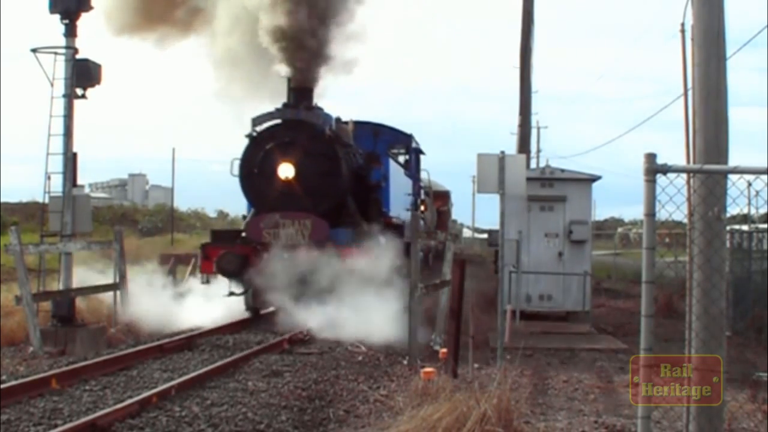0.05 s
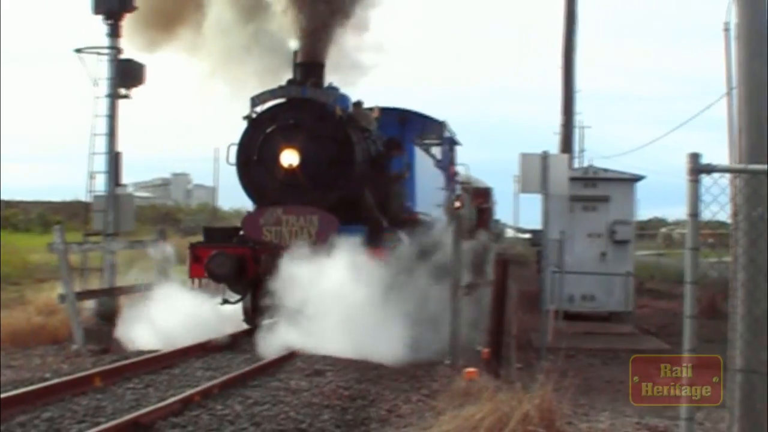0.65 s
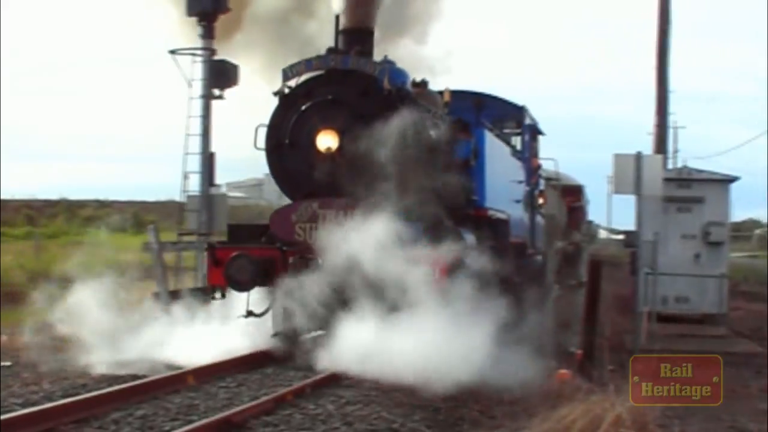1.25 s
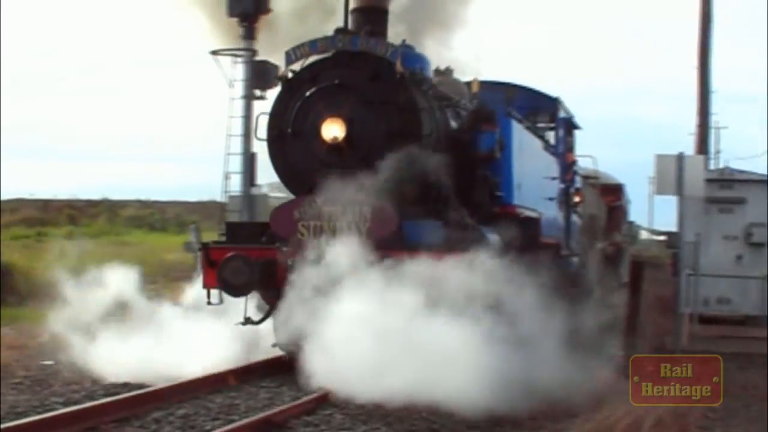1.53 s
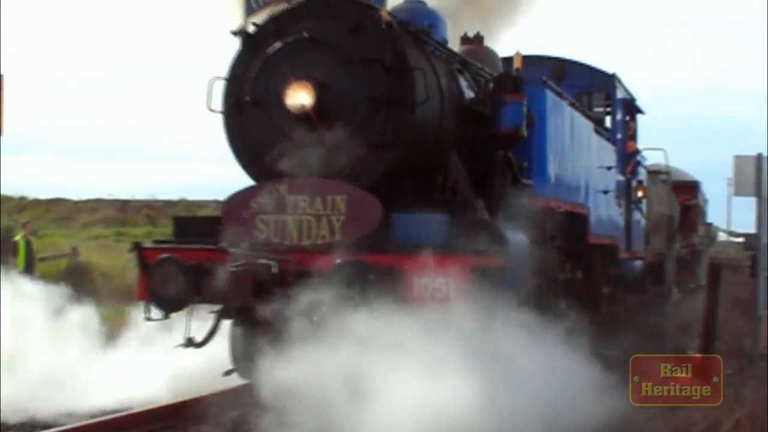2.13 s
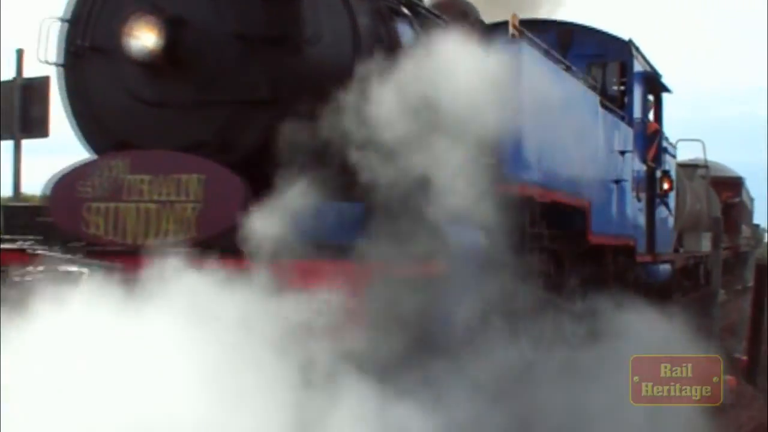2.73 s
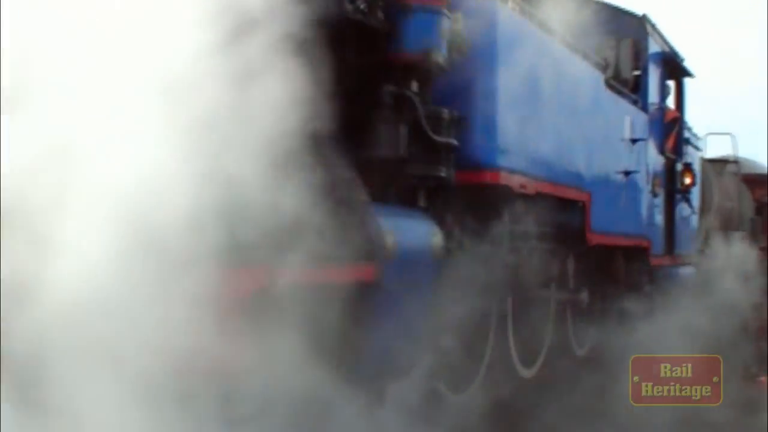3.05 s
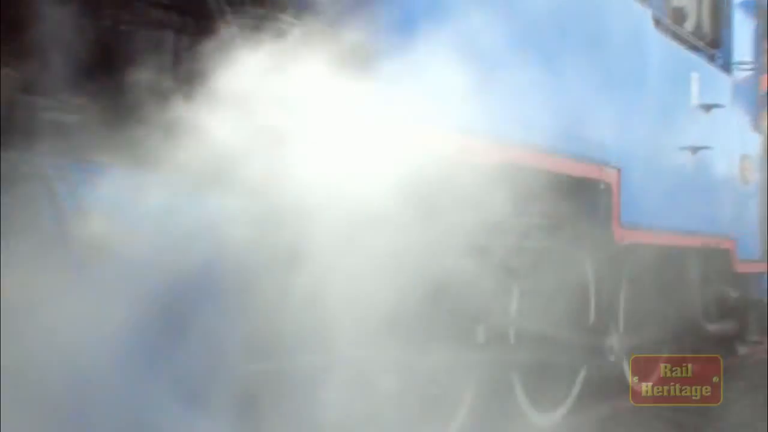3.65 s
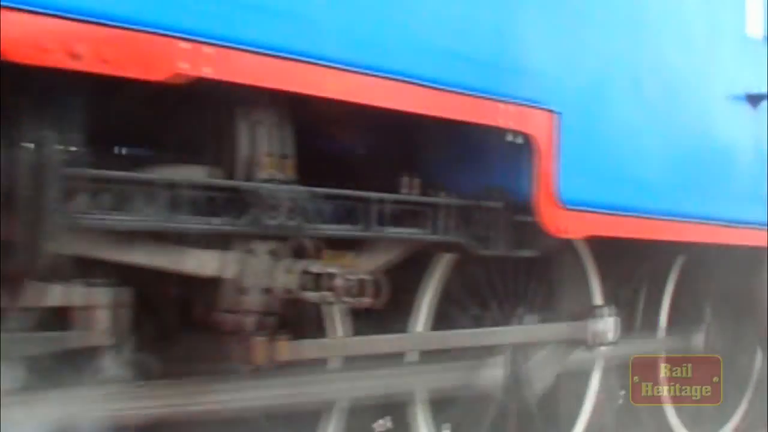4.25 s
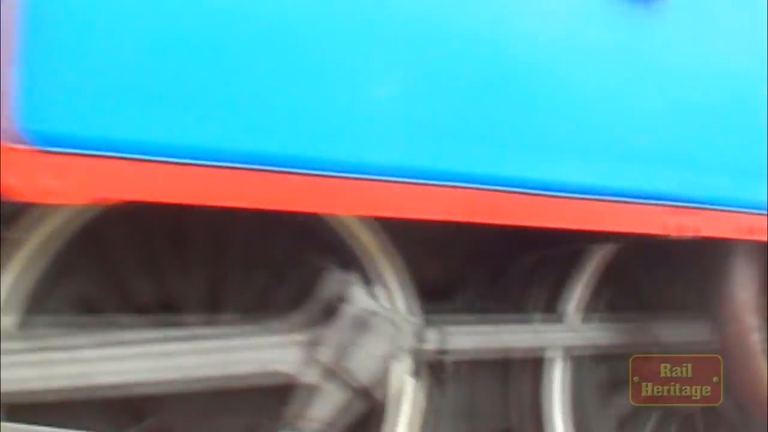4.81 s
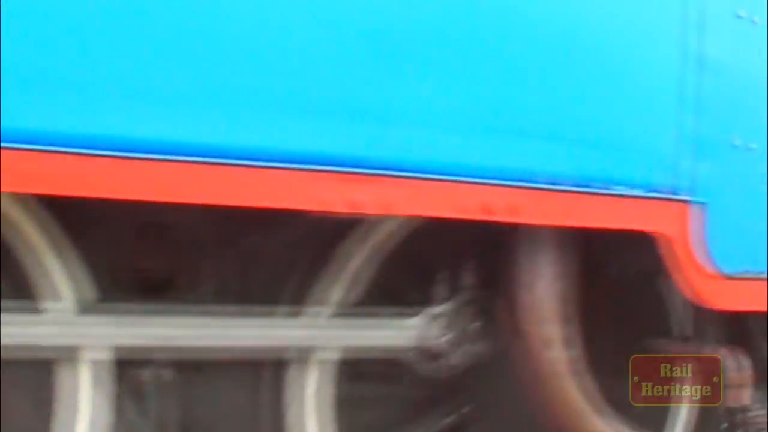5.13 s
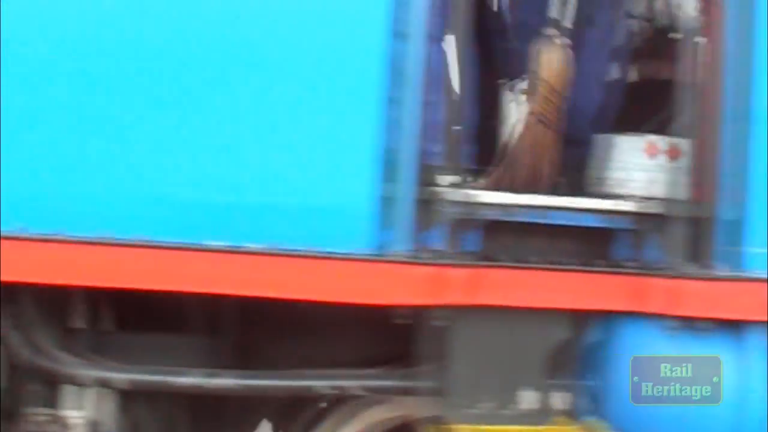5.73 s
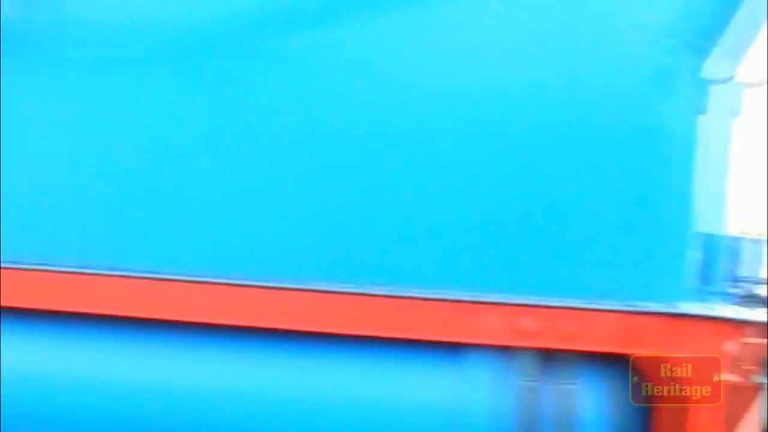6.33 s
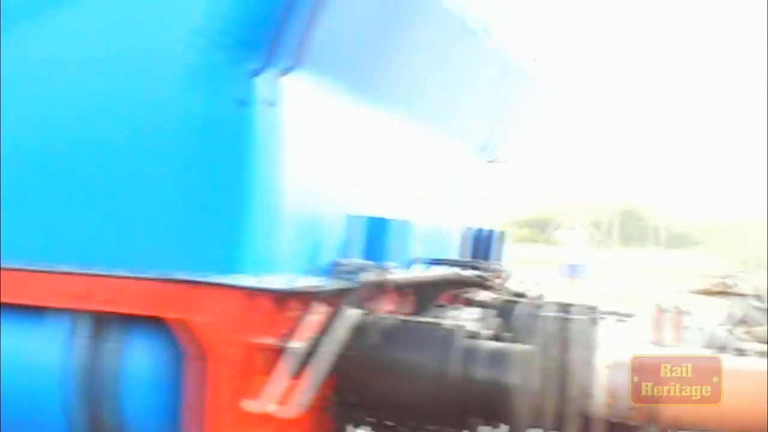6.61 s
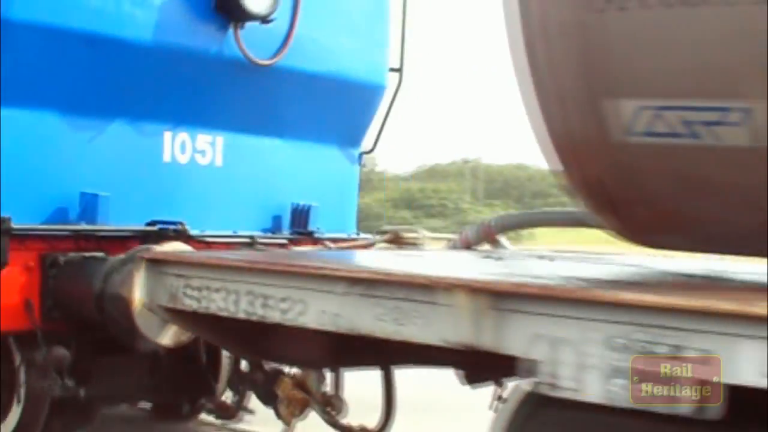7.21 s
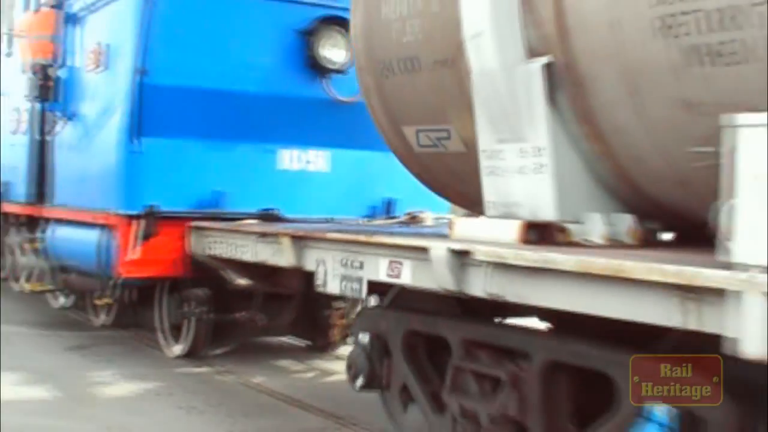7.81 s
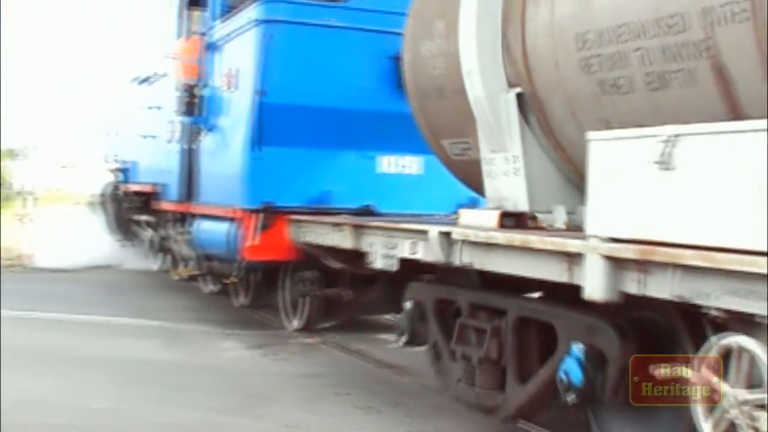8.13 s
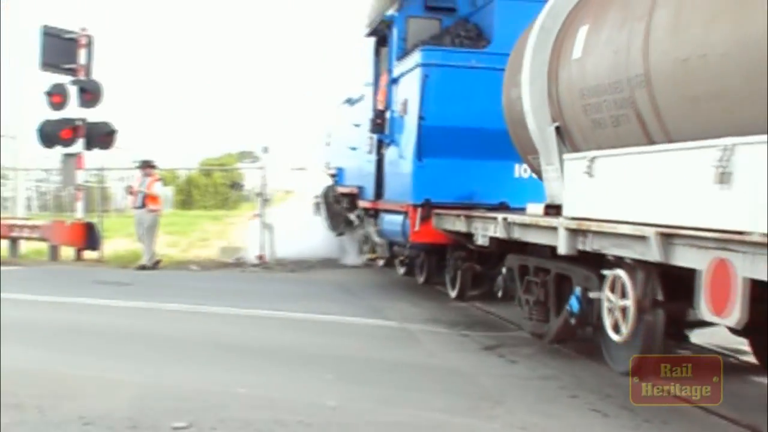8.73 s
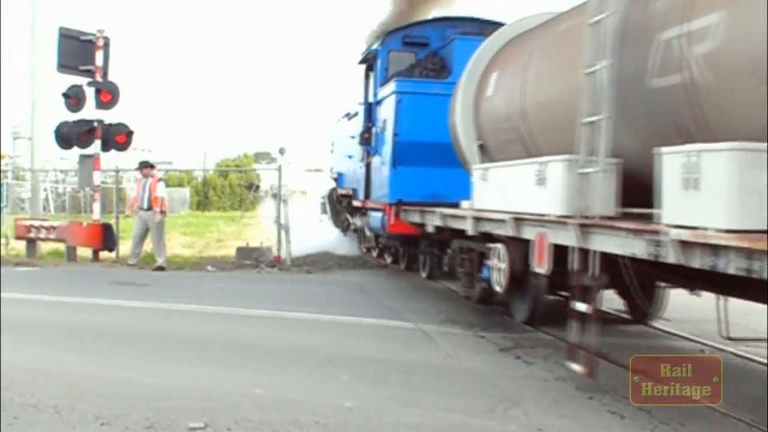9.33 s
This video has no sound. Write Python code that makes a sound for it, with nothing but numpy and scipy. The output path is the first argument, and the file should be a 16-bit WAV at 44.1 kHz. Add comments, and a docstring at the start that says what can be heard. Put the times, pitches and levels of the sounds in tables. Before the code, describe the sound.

A steam locomotive passes close by, hissing loudly over steady chimney puffs, then a wagon rumbles and knocks over rail joints.

```python
"""Beside a railway line, a steam tank engine comes up and passes close by with its cylinder cocks
(drain valves) open. Steam hisses onto the track stones and pulses with the pistons. The chimney
puffs four times to a wheel turn, slowly quickening: each puff is a bark with a low boom under it.
The steam cloud briefly blows over the microphones. Behind the engine a tank wagon drums and
knocks over a level crossing."""
import sys
import numpy as np
from scipy import signal
from scipy.fft import irfft, next_fast_len
from scipy.io import wavfile
from scipy.ndimage import uniform_filter1d

SR = 44100
rng = np.random.default_rng(int(sys.argv[2]) if len(sys.argv) > 2 else 0)


def put_to_file(sound):
    """Save the sound as 16-bit audio at rate SR, in the file named by the first command-line argument."""
    columns = np.atleast_2d(sound).T  # one column per channel
    safe = np.clip(columns, -1, 1)
    whole_steps = np.round(safe * 32767)
    wavfile.write(sys.argv[1], SR, whole_steps.astype(np.int16))


N = 413216
FRAME, HOP = 512, 128  # the hiss is built in short overlapping frames: length and step in samples
TIME = np.arange(N) / SR
FRAME_S = np.arange(N // HOP + 5) * HOP / SR
BIN_HZ = np.fft.rfftfreq(FRAME, 1 / SR)


# Steam loudness: (time [s], jet at the nozzle [relative dB], roar on the ground [relative dB])
STEAM_LEVELS = [(0, -16.5, -20), (.8, -15.9, -18.5), (1.4, -16.4, -19), (2.2, -15, -20), (2.7, -13, -17),
                (3.1, -13.5, -17.5), (3.6, -13, -17), (4.3, -14, -16.5), (4.7, -12.5, -17.5),
                (5.3, -14.5, -18.5), (5.7, -14, -22), (6.1, -14.5, -19.5), (6.65, -16.3, -23),
                (7, -16.5, -19.9), (8.2, -17.5, -20.5), (9.37, -18, -21)]
# Tone of the jet and the roar, far off and close by: (frequency [Hz], relative level [dB])
JET_FAR = [(2500, -66), (5500, -17), (6700, -10), (7300, -0.5), (8100, 0), (8800, -2), (9600, -4.5),
           (10600, -11.5), (12500, -17.5), (14000, -25), (16000, -29)]
JET_NEAR = [(2500, -38), (5000, -9), (6000, -4.5), (7300, -3), (8800, 0), (9600, -3.5), (11000, -10.5),
            (13000, -15), (16000, -23)]
ROAR_FAR = [(60, -15.5), (300, -25), (700, -21.5), (1050, -10.5), (1500, -8.5), (2000, -1.5), (2700, -0.5),
            (5000, 2.5), (6500, -1.5), (9000, -30), (16000, -45)]
ROAR_NEAR = [(40, -30), (150, -5.5), (400, -8.5), (900, -2.5), (2000, -0.5), (3200, 0.5), (4800, 0.5),
             (6500, -3.5), (9000, -9), (16000, -45)]

def steam_hiss(jet_db=0.34, roar_db=0.98, jet_pulse=1.08, roar_pulse=0.89):
    """Steam hisses from the cocks and roars on the ground, pulsing with the cylinder pressure."""
    colour_db = passing_colour()
    pulse_db = cylinder_pressure()
    jet_level, roar_level = follow(STEAM_LEVELS, TIME) + spurts()
    jet = plume(JET_FAR, JET_NEAR, colour_db, patchy_db=1.14, flutter_db=0.6, whistle_db=1.2)
    roar = plume(ROAR_FAR, ROAR_NEAR, colour_db, patchy_db=1.13, flutter_db=.5, whistle_db=1.54)
    jet *= amp(jet_level + jet_db + jet_pulse * pulse_db)
    roar *= amp(roar_level + roar_db + roar_pulse * pulse_db + billow())
    return jet + roar


def plume(far, near, colour_db, patchy_db, flutter_db, whistle_db):
    """Swirling steam makes noise with faint shifting whistles; it fills out as it nears."""
    nearness = position(FRAME_S)[0][:, None]
    swirl_db = patchy_db * eddies(frames=45, bins=6) + whistle_db * eddies(frames=110, bins=2)
    strength = amp(blend(far, near, nearness, BIN_HZ) + colour_db + swirl_db)
    strength /= np.linalg.norm(strength, axis=1, keepdims=True)  # same power in every frame
    strength *= amp(flutter_db * eddies(frames=9, bins=70))
    spectra = at_microphones(strength).transpose(0, 2, 1)
    _, hiss = signal.istft(spectra, nperseg=FRAME, noverlap=FRAME - HOP)
    return unit(hiss[:, :N])


# The ground's echo ripples the tone: (time [s], ripple spacing [Hz], depth [dB])
GROUND_RIPPLE = [(0, 546, 1), (2.0, 805, 0), (2.9, 1090, -0.5), (3.02, 1150, 3.5), (3.17, 1080, 0.5),
                 (3.45, 1180, 0), (7.2, 1370, -0.5), (8.0, 1420, 1.3), (9.37, 1440, -0.5)]
# Steam sweeps over the stones: (time [s], half length [s], pitch [Hz], half width [Hz], boost [dB])
SWISHES = [(0.303, 0.23, 2680, 690, 4), (0.862, 0.18, 4270, 450, 7), (1.892, 0.17, 2650, 870, 7),
           (2.6, 0.27, 3865, 40, 5), (4.57, 0.12, 6700, 600, 6), (5.29, 0.16, 2200, 300, 3.5),
           (6.15, 0.85, 6500, 600, 3), (7.2, 0.44, 4800, 810, 5)]
# The very top of the hiss dulls while it is heard from the side: (frequency [Hz], change [dB])
SIDE_TONE = [(8500, -0.5), (11000, 0), (16000, -4.5)]
# Tone of the hiss from behind: (frequency [Hz], change [dB])
REAR_TONE = [(1600, 0), (1930, 1), (2300, -1.8), (2950, 0), (3460, -4), (4100, 1.1), (5600, -0.2),
             (6750, -1.3), (7600, 0)]

def passing_colour(side_bearing=0.67, side_span=.2):
    """The ground colours the hiss (dB); its tone also shifts when heard from the side and behind."""
    spacing_hz, depth_db = (c[:, None] for c in follow(GROUND_RIPPLE, FRAME_S))
    colour_db = depth_db * np.cos(2 * np.pi * BIN_HZ / spacing_hz) * bump(BIN_HZ, 0, 8000)
    for s, length, hz, width_hz, db in SWISHES:
        colour_db += db * np.outer(bump(FRAME_S, s, length), bump(BIN_HZ, hz, width_hz))
    from_side = np.clip((position(FRAME_S)[1] - side_bearing) / side_span, 0, 1)
    colour_db += np.outer(from_side, read(SIDE_TONE, BIN_HZ))
    return colour_db + np.outer(from_behind(FRAME_S), read(REAR_TONE, BIN_HZ))


# The four beats of a wheel turn, far and near cylinder by turns: (puff accent [dB],
# sag from ahead [dB], sag from behind [dB], surge from ahead [dB], surge from behind [dB])
WHEEL_TURN = [(-0.5, 1.5, -0.1, 0.5, 0.5), (-0.3, 2, 4.5, .5, 0.44), (-0.2, .7, 0, 0.4, 0.1),
              (0.5, 2.6, 3, 0.6, 1)]

def cylinder_pressure(sag_delay_s=0.011, sag_s=0.02, surge_delay_s=0.082, surge_s=0.051):
    """The pressure (dB) sags as the exhaust opens, then surges with fresh steam."""
    db = np.zeros(len(FRAME_S))
    for beat, s in beats():
        _, sag_ahead, sag_behind, surge_ahead, surge_behind = WHEEL_TURN[beat % len(WHEEL_TURN)]
        sag_db = np.interp(passed(s), [0, 1], [sag_ahead, sag_behind])
        surge_db = np.interp(passed(s), [0, 1], [surge_ahead, surge_behind])
        db -= sag_db * bump(FRAME_S, s + sag_delay_s, sag_s)
        db += surge_db * bump(FRAME_S, s + surge_delay_s, surge_s)
    return np.interp(TIME, FRAME_S, db)


def billow(depth_db=1.0, crest_beat=2.8, near_lag_beats=1.84):
    """Front and rear cocks take turns, so the roar swells (dB) once a wheel turn; behind, they merge."""
    turns = (beat_count() - crest_beat - near_lag_beats * position(FRAME_S)[0]) / len(WHEEL_TURN)
    swell_db = depth_db * (1 - from_behind(FRAME_S)) * np.cos(2 * np.pi * turns)
    return np.interp(TIME, FRAME_S, swell_db)


# Extra gushes of steam: (start [s], length [s], jet change [dB], roar change [dB])
SPURTS = [(0.666, 0.11, 1, -1), (1.702, 0.13, 1, 1), (2.978, 0.17, -1.3, 2), (3.473, 0.064, 1, -0.5),
          (6.88, 0.22, 0, 0.4), (7.37, .07, 0, 1.4), (7.816, .08, .7, 1)]

def spurts(edge_s=.015):
    """The cocks spit, briefly changing the level (dB) of the jet and the roar."""
    db = np.zeros((2, N))
    for s, length, jet_db, roar_db in SPURTS:
        inside_s = np.minimum(TIME - s, s + length - TIME)
        db += np.outer([jet_db, roar_db], np.clip(inside_s / edge_s + .5, 0, 1))
    return db


# Sound from the side meets the two microphones out of step: (frequency [Hz], left's lead [radians])
SIDE_PHASE = [(100, .3), (1000, 0.099), (3000, 0.57), (5000, 1.3), (7200, 1.63), (9300, 2.6), (12000, 2.85),
              (16000, 2.1)]
# Balance for sound from ahead and from the side: (frequency [Hz], left minus right [dB])
BALANCE_AHEAD = [(100, -7), (2200, 0), (3800, -2), (6300, -3.5), (8000, 0), (9500, -5), (11500, -1.5),
                 (16000, 1)]
BALANCE_SIDE = [(100, -1), (4600, 0), (6000, 0.5), (8200, -1), (9600, 1), (11300, 4.5), (13000, 1.5),
                (15000, 0)]
# How alike left and right are, normally and for steam from the side: (frequency [Hz], likeness [0-1])
LIKENESS = [(25, 0.98), (160, 0.99), (450, 0.99), (800, 0.97), (2000, 1), (6500, 0.99), (8200, .9),
            (9400, 0.64), (11000, 0.52), (13300, 1), (16000, .98)]
LIKENESS_SIDE = [(100, 0.23), (2000, 1), (4000, 1), (5500, 0.99), (7500, 0.93), (9000, 0.87), (12000, 0.68),
                 (16000, 0.7)]

def at_microphones(strength, wrap_hz=4200, swing=0.99, enfold=1.7):
    """The steam's noise reaches left and right differently, depending on where it comes from."""
    _, bearing, surround = (c[:, None] for c in position(FRAME_S))
    sideways = np.clip(swing * bearing + enfold * surround, 0, 1)
    likeness = blend(LIKENESS, LIKENESS_SIDE, sideways, BIN_HZ)
    likeness *= 1 - surround * bump(BIN_HZ, 0, wrap_hz)  # in the cloud each side hears its own swirls
    balance_db = blend(BALANCE_AHEAD, BALANCE_SIDE, sideways, BIN_HZ)
    left = np.exp(.5j * bearing * read(SIDE_PHASE, BIN_HZ)) * amp(balance_db / 2)
    return random_pair(likeness, strength.shape) * strength * np.array([left, 1 / left])


# The cocks go by: (time [s], nearness [0-1], bearing [0 ahead, 1 beside], cloud around us [0-1])
PATH = [(0, 0.06, 0.04, 0), (2.2, 0.32, 0.04, 0.01), (2.8, 0.55, 0.014, 0.2), (3.4, 0.89, 0.055, 0.42),
        (4.0, 1, 0.47, 0.93), (4.35, 0.97, 0.71, 0.64), (4.55, 0.88, 0.93, 0.85), (5.5, 0.63, 0.97, 0.2),
        (6.4, 0.4, 0.97, 0), (7.2, 0.65, 0.76, 0), (8.1, 0.23, 0.42, 0), (8.6, 0.37, 0.16, 0),
        (9.37, 0.07, 0.16, 0.03)]

def position(s):
    """Nearness, bearing and surrounding cloud at s seconds."""
    return follow(PATH, s)


def passed(s, start_s=1.9, span_s=2.4):
    """How far the pistons' sound has turned from coming (0) to going (1)."""
    return np.clip((s - start_s) / span_s, 0, 1)


def from_behind(s, start_s=7.3, span_s=0.86):
    """How much the engine is heard from behind, 0 to 1."""
    return np.clip((s - start_s) / span_s, 0, 1)


# Puff strength: (time [s], far cylinder [relative dB], near cylinder [relative dB], boom offset [dB])
PUFF_LEVELS = [(0, -25.5, -27.5, -6), (1.4, -26.5, -26, -4), (2.15, -23, -24, -5.5), (2.7, -26.5, -24, -4),
               (3.4, -31, -24, -3), (4.2, -29.5, -23, -.5), (4.9, -30, -20.3, -1),
               (5.5, -23.5, -19.5, -5.5), (6.1, -26.5, -23.5, -8), (6.7, -21.5, -19.5, -5.5),
               (7.9, -30, -19.5, -7), (8.5, -24.5, -21, -0.5), (9.37, -31, -20.5, -14)]
# Puffs that boom harder than the rest: (time [s], extra boom [dB])
HEAVY_PUFFS = [(.065, 6.5), (1.4, 4.5), (3.45, 3.5), (4.93, 3.5), (7.33, 5.5), (8.72, 6)]
# Tone of the bark from ahead and behind, and of the boom: (frequency [Hz], relative level [dB])
BARK_AHEAD = [(40, -33), (150, 1), (260, -12), (365, 3), (510, -5), (750, -4.5), (1100, -4), (1600, -6),
              (4000, -28), (12000, -60)]
BARK_BEHIND = [(40, -25), (140, -0.5), (290, 2.5), (400, -1), (560, 1), (830, -1), (1050, -3), (1300, -3),
               (1600, -4), (1900, -6), (3000, -7), (12000, -39)]
BOOM_TONE = [(25, -38), (60, -42), (100, -23), (135, -7.5), (163, 6), (200, -2), (260, -16), (400, -21),
             (1500, -45)]

def chimney(bark_db=2.5, valve_open_s=0.15, boom_lag=1.47, rebound_s=0.043, rebound_db=-5.5):
    """Steam barks out until the valve shuts; the air in the smokebox below booms and rebounds once."""
    out, t = np.zeros((2, N)), np.arange(SR // 4) / SR
    valve = np.exp(-(t / valve_open_s) ** 6)
    for beat, peak_s in beats():
        far_db, near_db, boom_db = follow(PUFF_LEVELS, peak_s)
        boom_db += sum(db for s, db in HEAVY_PUFFS if abs(s - peak_s) < .1)
        level = (near_db if beat % 2 else far_db) + WHEEL_TURN[beat % len(WHEEL_TURN)][0]
        rise_s = .035 - .011 * position(peak_s)[0]  # snappier close by
        start_s, gone = peak_s - rise_s, passed(peak_s)
        rise_s += 0.0049 * from_behind(peak_s)  # softer from behind

        def bark_tone(hz):
            return blend(BARK_AHEAD, BARK_BEHIND, gone, hz) + hollow_ring(hz) + ground_echo(hz, beat)

        bark = puff(bark_tone, swell(t / rise_s, sharpness=1.52 + 0.22 * gone) * valve)
        boom = puff(lambda hz: read(BOOM_TONE, hz), swell(t / rise_s / boom_lag, sharpness=3.6))
        boom *= amp(level + boom_db)
        add(out, start_s, amp(level + bark_db) * bark + boom)
        add(out, start_s + rebound_s, amp(rebound_db - 7 * gone) * boom)
    return out


def puff(colour_db, shape):
    """A gust of noise whose loudness follows the given shape."""
    gust = noise(colour_db, size=len(shape)) * shape
    return gust * np.sqrt(np.sum(shape ** 2) / np.sum(gust ** 2 / 2))


# The chimney's hollow notes: (pitch [Hz], half width [Hz], boost [dB])
CHIMNEY_NOTES = [(510, 65, 2.5), (660, 28, 2), (820, 53, 3.5), (960, 74, 3.5), (1910, 90, 6)]

def hollow_ring(hz):
    """The air inside the chimney boosts (dB) the pitches it rings at."""
    return sum(db * bump(hz, pitch_hz, width_hz) for pitch_hz, width_hz, db in CHIMNEY_NOTES)


def ground_echo(hz, beat, bounce=.72, rough_hz=2800, nearest_spacing_hz=246.5, nearest_beat=15.1):
    """The bark bounces off rough stones, rippling its tone (dB); the ripples widen with distance."""
    distance = np.hypot(1, 0.1416 * (beat - nearest_beat))  # 1 at the closest point
    spacing_hz = nearest_spacing_hz * distance
    echo = bounce * bump(hz, 0, rough_hz) * np.exp(-2j * np.pi * hz / spacing_hz)
    return 20 * np.log10(abs(1 + echo))


# The engine gathers speed: (time [s], puff rate [beats per second])
SPEED = [(0, 3.679), (1.6, 3.846), (3, 3.956), (9.37, 4.39)]

def beat_count(first_beat=.236):
    """Beats gone by at each frame, counted from the first puff."""
    return np.cumsum(follow(SPEED, FRAME_S)[0]) * HOP / SR - first_beat


def beats(late_beats=.018):
    """Number and time (s) of every puff; the near cylinder's valve opens a little late."""
    count = beat_count()
    return [(k, np.interp(k + late_beats * (k % 2), count, FRAME_S)) for k in range(int(count[-1]) + 1)]


# Loudness of the wagon's drumming: (time [s], relative level [dB])
DRUM_LEVELS = [(0, -51), (2.4, -48), (3.3, -39), (4.3, -43), (5.4, -31.5), (6.2, -32.5), (6.55, -24.5),
               (7.1, -27.5), (7.5, -22.5), (8.15, -25), (8.6, -19.5), (8.9, -24.5), (9.1, -24), (9.24, -16),
               (9.37, -19.5)]
# Tone of the drumming: (frequency [Hz], relative level [dB])
DRUM_TONE = [(20, -41), (45, -30), (70, -18), (105, -9), (150, -4), (185, 1), (215, 0.5), (260, -6),
             (340, -12.5), (600, -14), (1200, -19), (3000, -31), (12000, -57)]
# Wheels hit rail joints: (time [s], relative level [dB])
KNOCKS = [(7.343, -7), (7.508, -12), (8.284, -7), (8.718, -0.5), (9.136, -15), (9.275, -10), (9.353, -7)]
# The wagon's ringing notes: (base pitch [Hz], relative level [dB], time to fade by 60 dB [s])
WAGON_NOTES = [(112, -23, 0.098), (171.5, -2, 0.19), (221, -13, 0.14), (290, -25, 0.035), (484, 8, 0.011),
               (640, -13, 0.076), (990, -16, 0.048)]

def wagon_wheels(drum_db=-1.0, knock_db=-2.5, contact_s=0.0031):
    """Rolling wheels make the wagon drum; each rail joint knocks it and makes it ring."""
    out = noise(lambda hz: read(DRUM_TONE, hz), size=N) * amp(follow(DRUM_LEVELS, TIME)[0] + drum_db)
    t = np.arange(SR // 4) / SR
    for s, level in KNOCKS:
        ring = np.zeros(len(t))
        for hz, db, fade_s in WAGON_NOTES:
            cycles = hz * rng.uniform(1.0, 1.05) * t + rng.random()
            ring += amp(db - 60 * t / fade_s) * np.sin(2 * np.pi * cycles)
        add(out, s, amp(level + knock_db) * ring * (1 - np.exp(-t / contact_s)))
    return out


def cloud_gust(peak_s=4.15, half_length_s=0.11, db=-30):
    """The steam cloud blows over the microphones, shaking each on its own."""
    out, t = np.zeros((2, N)), np.arange(SR) / SR
    tone = [(20, -23), (85, -1), (200, 4), (600, -20), (3000, -45)]  # (frequency [Hz], level [dB])
    gust = np.array([noise(lambda hz: read(tone, hz), size=SR)[0] for _ in range(2)])
    add(out, peak_s - .5, amp(db) * gust * bump(t, .5, half_length_s))
    return out


def lineside_echoes(sound, fade_s=0.64, echo_db=-19, echoes_per_s=2000):
    """Huts, fences and ground by the line throw back a thin scatter of echoes."""
    t = np.arange(SR // 2) / SR
    echoes = rng.standard_normal((2, len(t))) * (rng.random((2, len(t))) < echoes_per_s / SR)
    echoes *= amp(-60 * t / fade_s) * (t > .02)
    echoes += echoes.mean(0) * 2  # left and right share most of them
    echoes /= np.linalg.norm(echoes[0])
    return amp(echo_db) * signal.fftconvolve(sound, echoes, axes=1)[:, :N]


def amp(db):
    """Turns decibels into a gain."""
    return 10 ** (np.asarray(db) / 20)


def unit(x):
    """Scales a signal to an average power of 1."""
    return x / np.sqrt(np.mean(x ** 2) + 1e-20)


def bump(x, centre, half_width):
    """A bell curve, 1 at its centre."""
    return np.exp(-((x - centre) / half_width) ** 2)


def swell(age, sharpness):
    """Rises from 0, peaks at age 1, then dies away."""
    return (age * np.exp(1 - age)) ** sharpness


def read(points, hz):
    """Looks up a table at any frequency, joining its points on a log scale."""
    f, value = np.transpose(points)
    return np.interp(np.log(hz + 1), np.log(f + 1), value)


def blend(first, second, share, hz):
    """Values part of the way from one frequency table to another."""
    return (1 - share) * read(first, hz) + share * read(second, hz)


def follow(rows, t):
    """Looks up every column of a time table at the times t."""
    s, *columns = np.transpose(rows)
    return [np.interp(t, s, c) for c in columns]


def add(mix, s, sound):
    """Mixes a sound in at s seconds."""
    part = mix[:, max(0, round(s * SR)):][:, :sound.shape[-1]]
    part += sound[..., :part.shape[1]]


def random_pair(likeness, shape):
    """Random left and right spectra: a shared part plus and minus a second part."""
    a, b, c, d = rng.standard_normal((4, *shape))
    likeness = np.clip(likeness, 0, 1)
    mid = np.sqrt(1 + likeness) * (a + 1j * b)
    side = np.sqrt(1 - likeness) * (c + 1j * d)
    return np.array([mid + side, mid - side]) / 2


def noise(colour_db, size):
    """Stereo noise whose tone is set by colour_db, a function of frequency."""
    padded = next_fast_len(size)
    hz = np.fft.rfftfreq(padded, 1 / SR)
    spectra = random_pair(read(LIKENESS, hz), hz.shape) * amp(colour_db(hz))
    return unit(irfft(spectra, padded)[:, :size])


def eddies(frames, bins):
    """Smooth random patches, so many frames long and so many frequency bins wide."""
    speckle = rng.standard_normal((len(FRAME_S), len(BIN_HZ)))
    streaks = uniform_filter1d(speckle, frames, 0, mode="wrap")
    return unit(uniform_filter1d(streaks, bins, 1, mode="wrap"))


def scene():
    """Steam, chimney puffs and wheels as the train goes by."""
    puffs = chimney()
    hiss = steam_hiss()
    train = puffs + lineside_echoes(puffs) + wagon_wheels()
    return hiss + train * amp([[-.3], [.3]]) + cloud_gust()  # puffs and wheels lean slightly right


def record(dry):
    """Rounds off the highest peaks and cuts the very top of the treble."""
    ceiling, cutoff_hz = .92, 15900
    rounded = dry / (1 + (dry / ceiling) ** 8) ** (1 / 8)
    lowpass = signal.firwin(511, cutoff_hz, window=("kaiser", 9), fs=SR)
    return signal.oaconvolve(rounded, lowpass[None], "same")


dry = scene()
out = record(dry)
put_to_file(out)
```